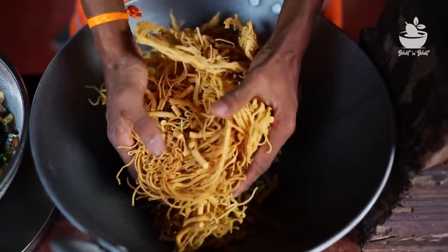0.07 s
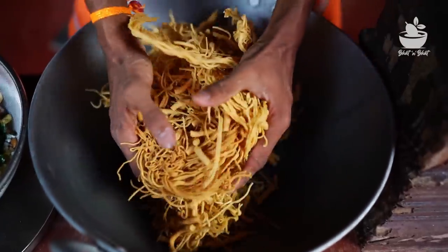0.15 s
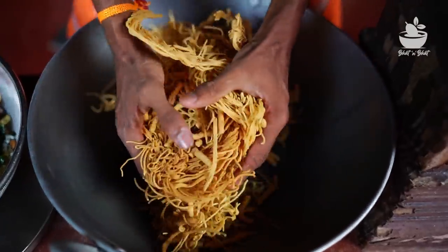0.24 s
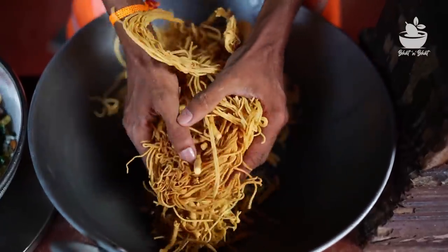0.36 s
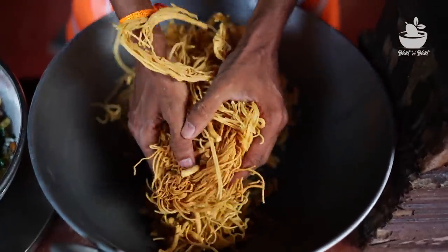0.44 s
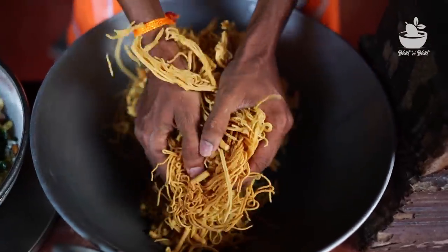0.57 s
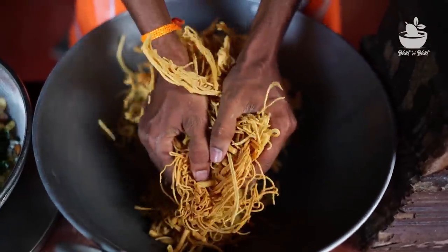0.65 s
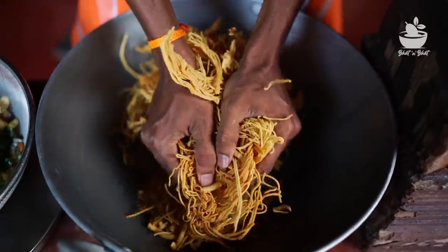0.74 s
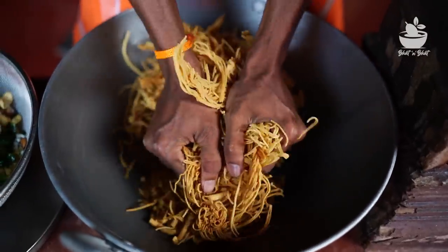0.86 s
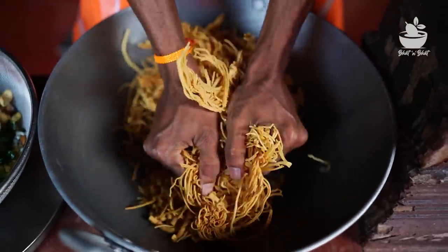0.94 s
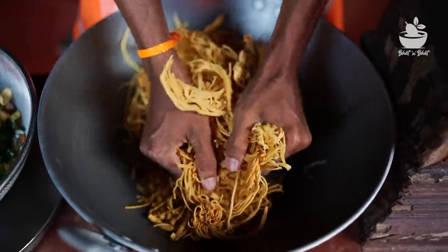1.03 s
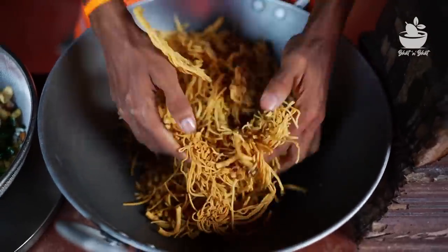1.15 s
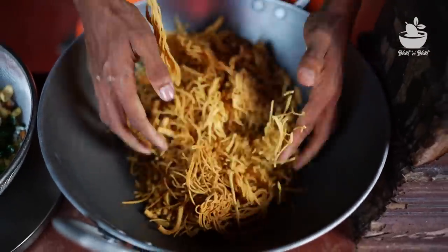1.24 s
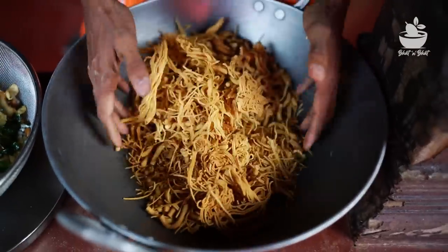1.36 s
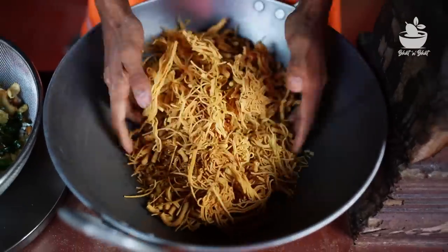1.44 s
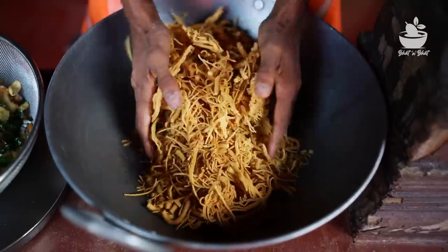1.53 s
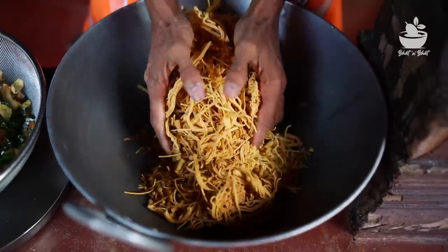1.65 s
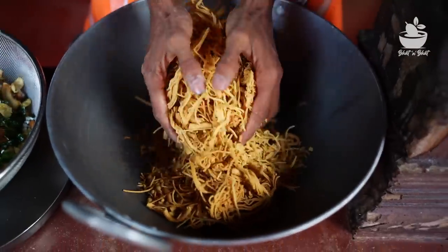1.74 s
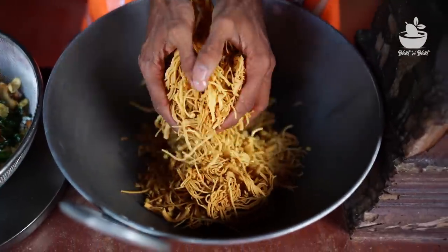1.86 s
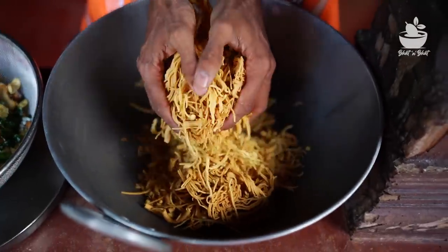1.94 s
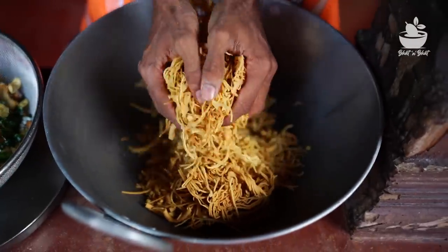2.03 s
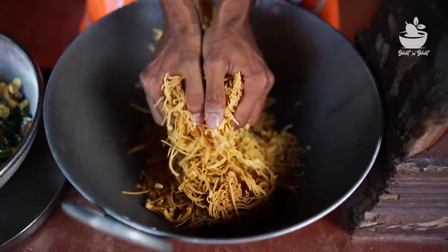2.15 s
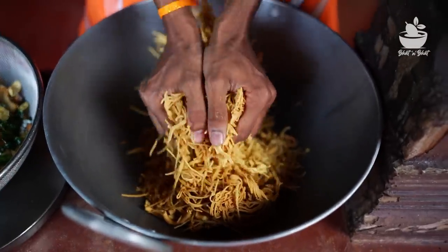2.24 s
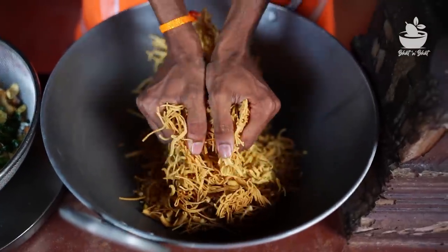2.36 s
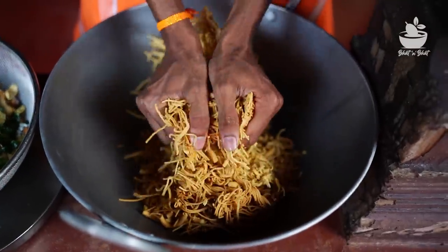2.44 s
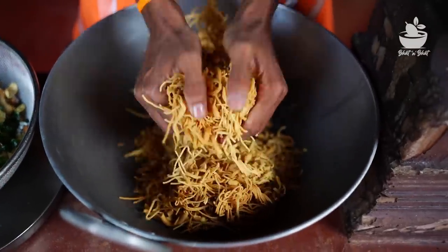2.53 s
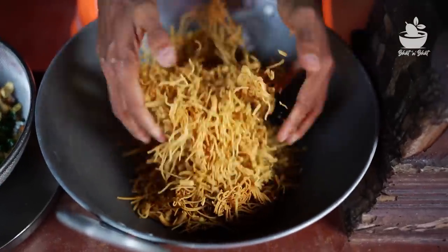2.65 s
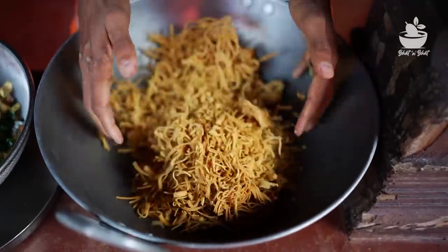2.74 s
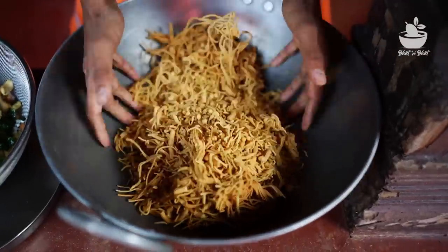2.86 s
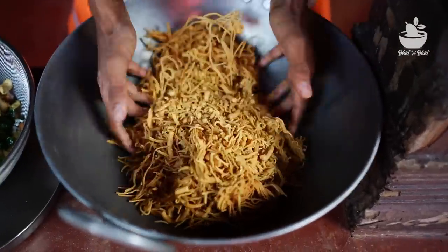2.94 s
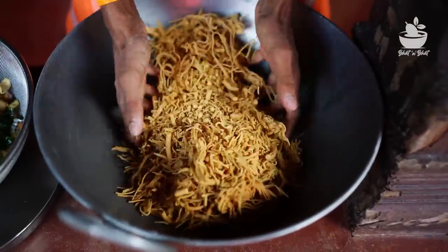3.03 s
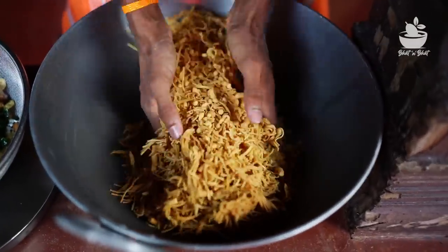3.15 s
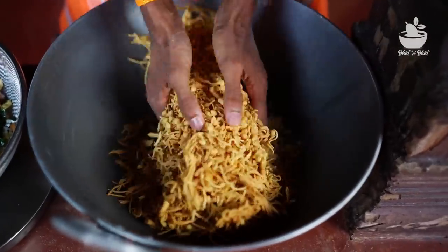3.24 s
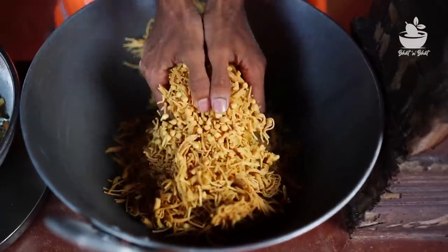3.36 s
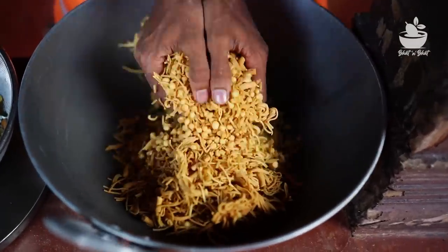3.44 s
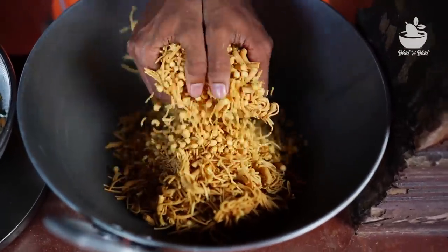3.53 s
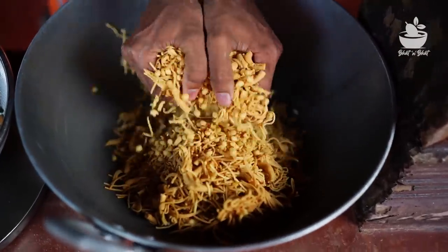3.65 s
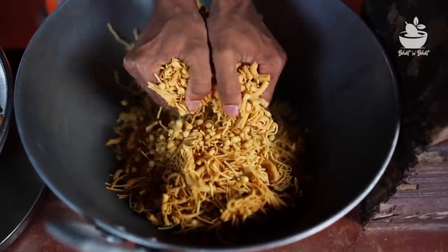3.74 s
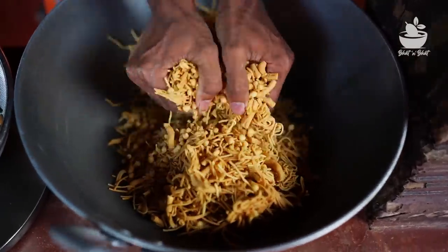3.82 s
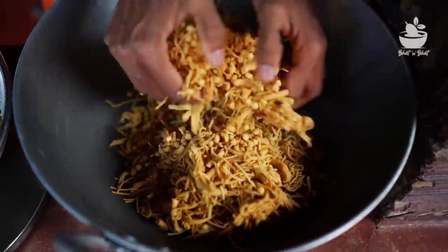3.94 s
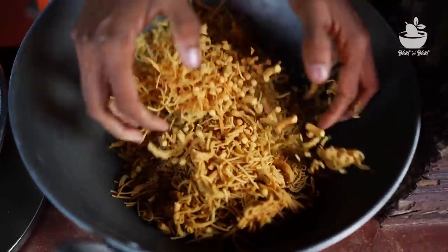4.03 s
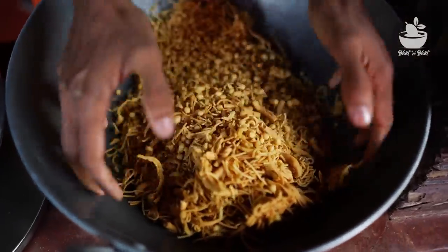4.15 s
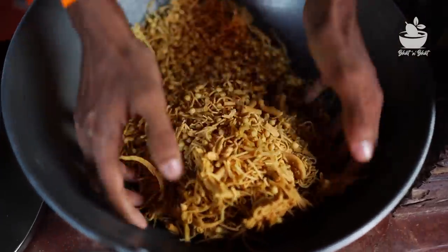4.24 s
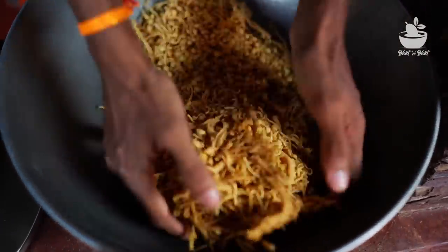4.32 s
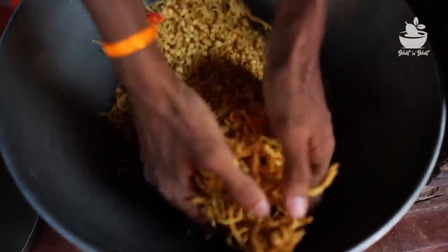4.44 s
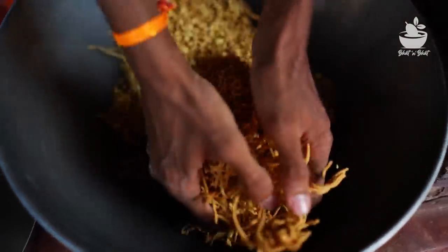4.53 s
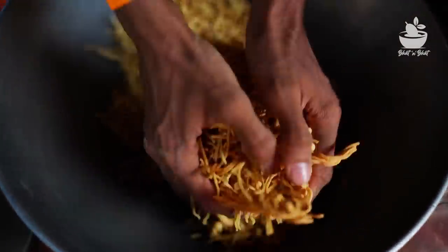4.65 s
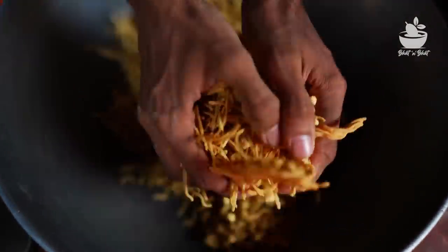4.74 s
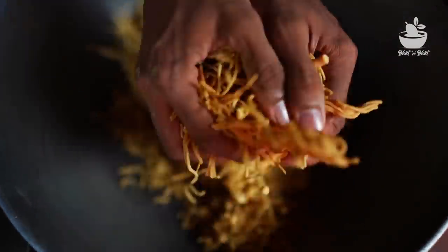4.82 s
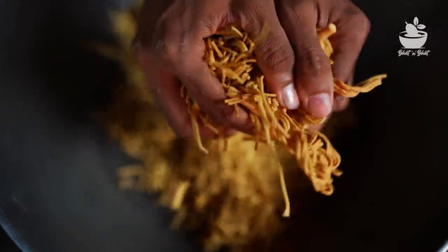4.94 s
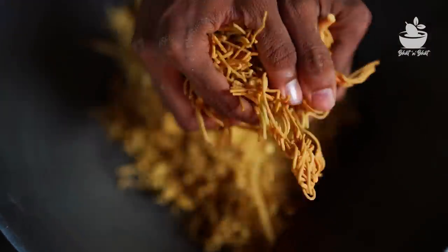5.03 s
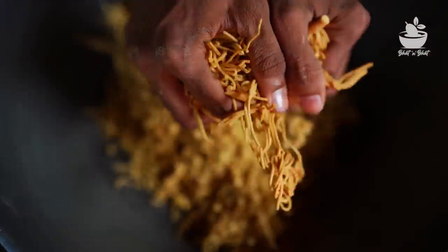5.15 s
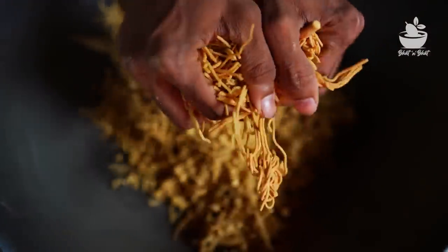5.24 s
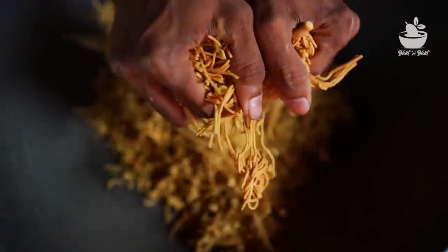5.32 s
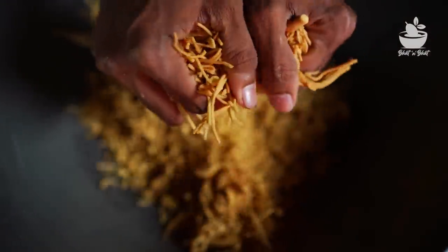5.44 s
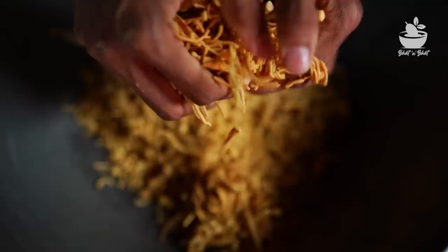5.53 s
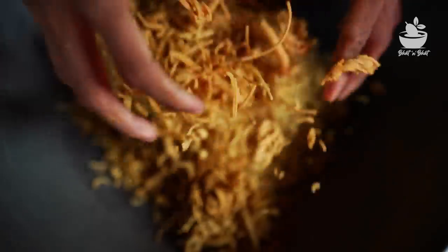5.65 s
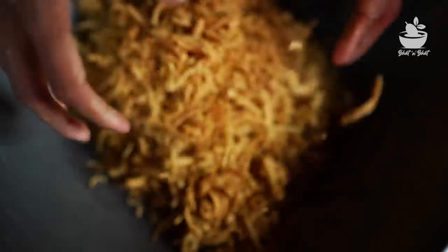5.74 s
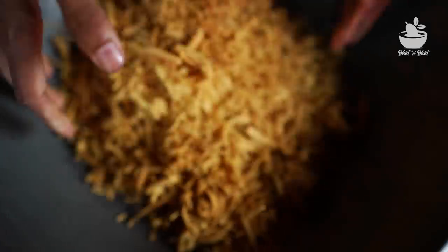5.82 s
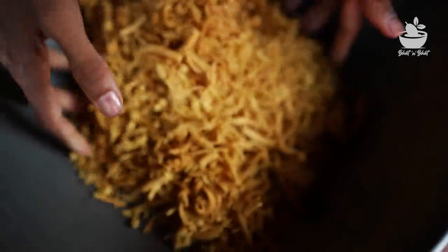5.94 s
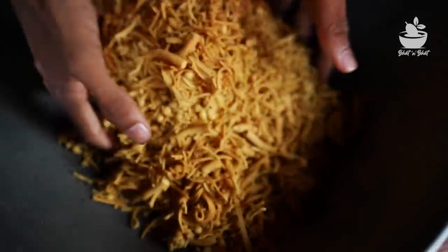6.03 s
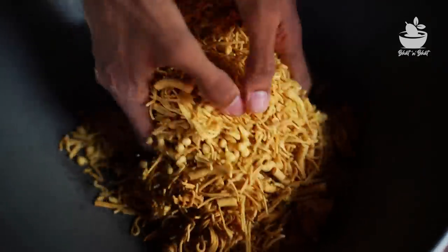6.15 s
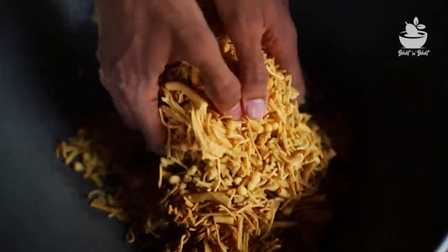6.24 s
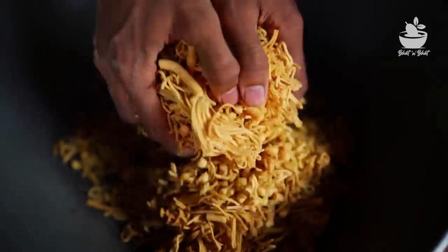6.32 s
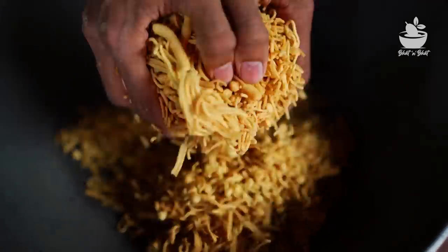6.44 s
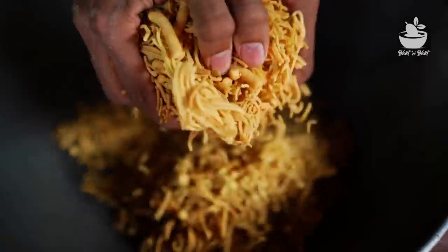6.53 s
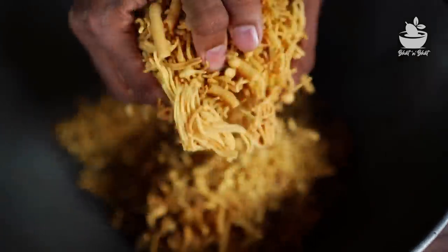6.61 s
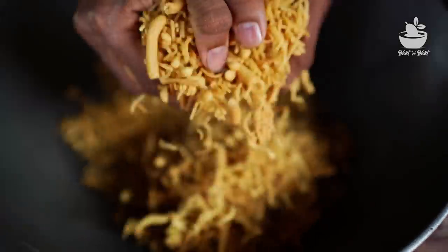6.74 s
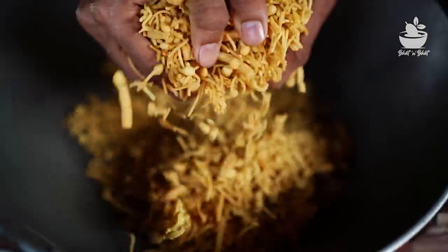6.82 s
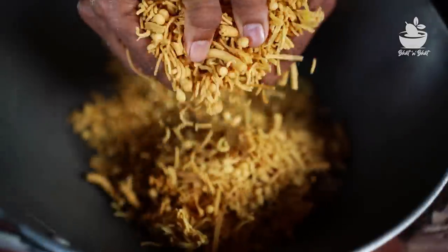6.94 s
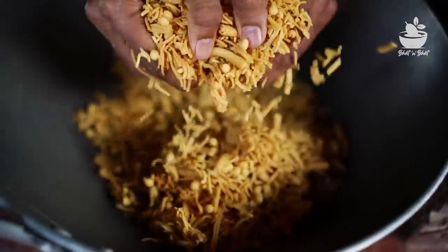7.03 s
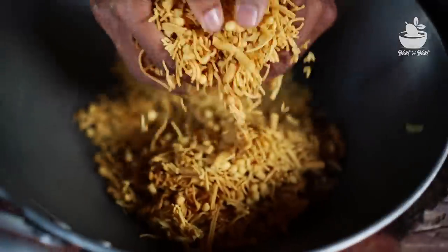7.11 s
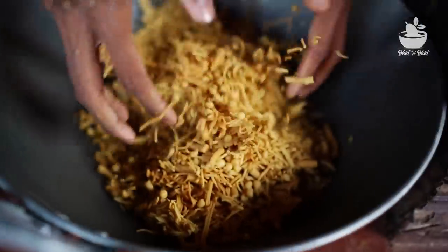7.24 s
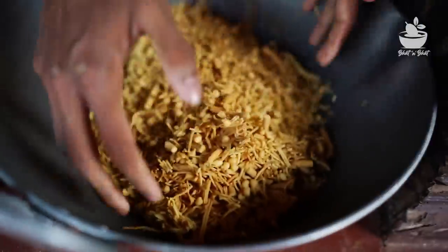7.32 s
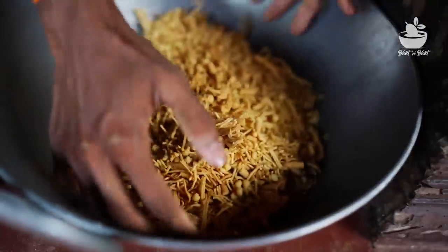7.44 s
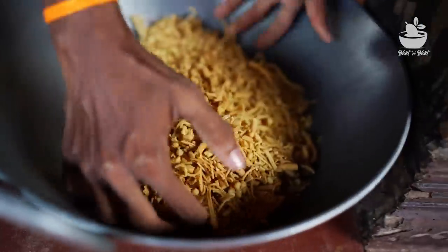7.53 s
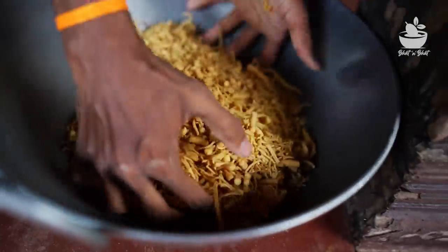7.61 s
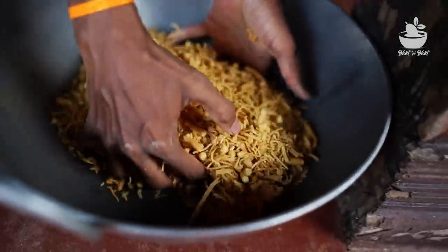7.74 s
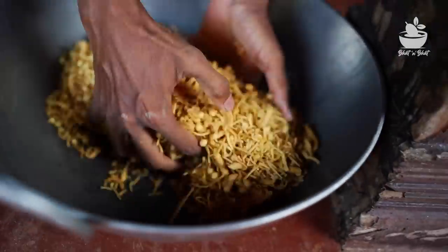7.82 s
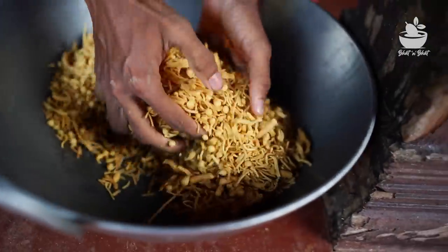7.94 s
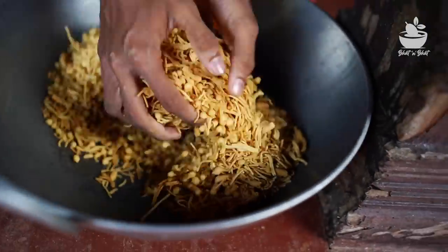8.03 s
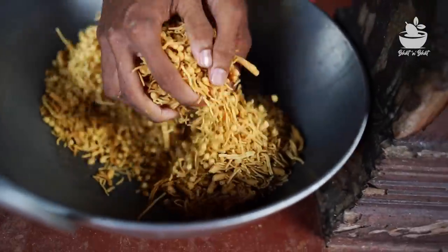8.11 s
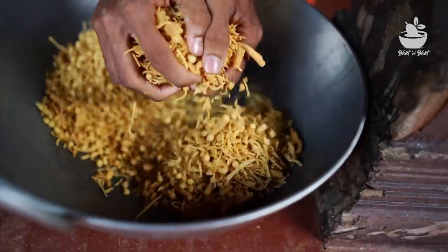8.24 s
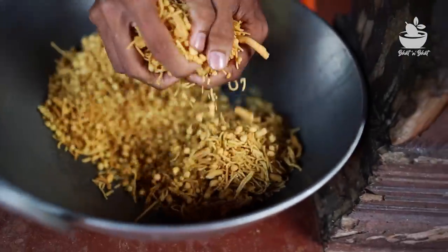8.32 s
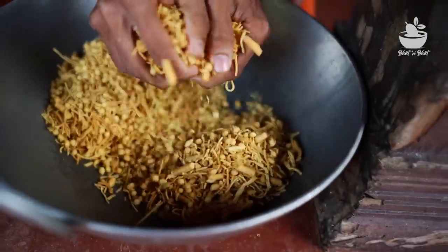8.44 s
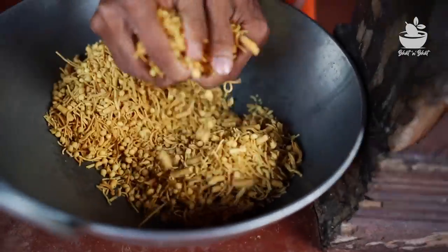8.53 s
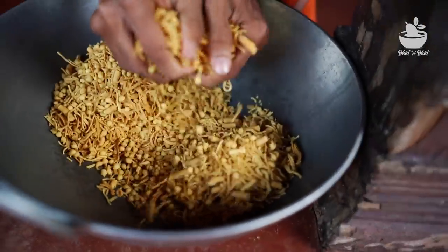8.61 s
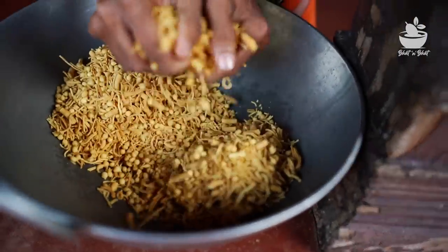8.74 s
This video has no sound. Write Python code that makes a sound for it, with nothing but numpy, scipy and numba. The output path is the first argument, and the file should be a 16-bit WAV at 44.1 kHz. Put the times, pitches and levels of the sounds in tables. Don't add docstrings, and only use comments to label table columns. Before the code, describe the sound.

Close, crisp crunching of dry fried strands squeezed by hand, handfuls dropping and rattling into a ringing metal wok, low steady kitchen hum beneath.

```python
import sys
import numpy as np
from scipy import signal
from scipy.fft import rfft, irfft, next_fast_len
from scipy.io import wavfile
from scipy.ndimage import uniform_filter1d
from numba import njit

SR = 44100
rng = np.random.default_rng(int(sys.argv[2]) if len(sys.argv) > 2 else 0)


def makeup_ratio(level_db):
    decades = np.asarray(level_db, float) / 20
    return 10 ** decades


def master_out(mix):
    frames = np.transpose(np.atleast_2d(mix))
    ceiling = np.clip(frames, -1, 1)
    pcm = np.round(ceiling * 32767).astype(np.int16)
    wavfile.write(sys.argv[1], SR, pcm)


N = 386905

# (frequency [Hz], density [dB per Hz])
SNAP_SPECTRUM = [(530, -31), (900, -15), (2330, -13.5), (2470, -16.5), (3680, -5.5), (5280, -7.5),
                 (7310, -4), (9530, -4.5), (13800, -15), (16000, -14.5)]
RATTLE_SPECTRUM = [(1650, -17.5), (2800, -20.5), (3160, -8), (4060, -4), (5610, -4.5), (5850, -7.5),
                   (6290, -5), (12000, -13.5), (15600, -24), (22000, -60)]
SLIDE_SPECTRUM = [(820, -37), (1400, -22), (1910, -4.5), (2070, -8), (2270, -4), (2510, -7), (2900, -10.5),
                  (3770, -8.5), (6380, -120)]
BOWL_SPECTRUM = [(71, -41), (120, -22), (177, -19), (251, -2), (307, -4), (422, -2.5), (459, -4.5),
                 (866, -10), (962, -20), (1500, -22.5), (1950, -63), (3300, -120)]
KITCHEN_SPECTRUM = [(15, -59), (25, -29), (54, -19), (145, -10), (237, 0.5), (297, -10), (419, -3.5),
                    (600, -27), (1400, -11), (2600, -60)]

# (frequency [Hz], width [Hz], level [dB])
WOK_MODES = [(3210, 51, -2), (3530, 38, -6.5), (4080, 98, 1.2), (4320, 88, -1), (4690, 68, -0.5),
             (4977, 36, 0.5), (5460, 65, 2.5), (5870, 35, -1.5), (6170, 74, 2.5), (6560, 31, -7),
             (6870, 64, -2.5), (7700, 100, -2.5), (8300, 64, -6)]
# (frequency [Hz], width [Hz], level [dB])
KNOCK_MODES = [(490, 130, 5.5), (725, 16, -4), (830, 9.9, -5), (1190, 95, -5)]

# (start [s], full [s], easing [s], end [s], effort [dB])
SQUEEZES = [(-.05, 0.12, 0.14, 0.5, -33), (0.375, 0.47, 0.81, 0.68, -31), (0.643, 0.715, 0.81, 0.99, -26),
            (0.845, 0.903, 0.94, 0.98, -25), (.95, .98, 0.98, 1.14, -36.5),
            (1.275, 1.308, 1.37, 1.34, -38.5), (1.984, 2.065, 2.15, 2.24, -32.5),
            (2.083, 2.236, 2.34, 2.473, -27), (3.46, 3.71, 3.76, 3.98, -32.5),
            (4.057, 4.103, 4.03, 4.21, -29), (4.327, 4.415, 4.3, 4.52, -32),
            (4.64, 4.907, 5.26, 5.09, -34.5), (5.077, 5.13, 5.2, 5.27, -31.5),
            (5.185, 5.29, 5.42, 5.38, -28), (5.37, 5.41, 5.1, 5.51, -40), (6.51, 6.8, 6.87, 7.0, -31),
            (6.95, 6.966, 6.8, 7.04, -33.5), (8.249, 8.502, 9.4, 10.1, -36.5)]
# (start [s], full [s], easing [s], end [s], weight [dB])
DROPS = [
    (1.153, 1.2, 1.23, 1.374, -28),
    (2.685, 2.73, 2.79, 2.81, -29),
    (4.004, 4.042, 4.07, 4.17, -28.5),
    (5.64, 5.7, 5.8, 5.8, -31),
    (5.772, 5.802, 5.8, 5.88, -29.5),
    (7.184, 7.253, 7.4, 7.34, -28.5),
    (8.13, 8.204, 8.1, 8.7, -33.5),
]
# (start [s], full [s], easing [s], end [s], push [dB])
SCOOPS = [(1.42, 1.526, 1.57, 1.66, -23.5), (1.58, 1.662, 1.815, 1.947, -29.5),
          (2.904, 2.994, 3.21, 3.29, -25.5), (3.252, 3.323, 4.2, 3.74, -34), (3.583, 3.727, 3.9, 3.78, -29),
          (4.287, 4.395, 4.52, 4.555, -25.5), (4.552, 4.599, 4.8, 4.94, -38.5),
          (5.945, 6.037, 6.13, 6.32, -23.5), (6.25, 6.34, 6.6, 6.83, -37),
          (7.574, 7.663, 7.78, 7.94, -23.5), (7.894, 7.97, 8.6, 8.33, -34)]
# (start [s], full [s], easing [s], end [s], flow [dB])
TRICKLES = [(-.1, 0, 0.013, 0.087, -30.5), (2.78, 2.84, 2.88, 2.96, -28.5), (3.8, 3.85, 4.6, 3.6, -35),
            (4.18, 4.3, 4.36, 4.42, -25.5), (5.415, 5.464, 5.4, 5.59, -38), (5.82, 5.866, 5.95, 6.0, -32.5),
            (6.624, 6.776, 7, 6.9, -29.5), (6.98, 7.02, 7.4, 7.2, -39.5), (7.26, 7.295, 7.37, 7.48, -31),
            (7.41, 7.43, 7.45, 7.5, -37.5), (7.48, 7.516, 7.55, 8.34, -31), (8.25, 8.33, 8.56, 8.6, -31)]
# (start [s], full [s], easing [s], end [s], load [dB])
LEANS = [(.85, 0.943, 0.99, 1.1, -37.5), (1.33, 1.38, 1.4, 1.4, -36.5), (1.565, 1.62, 1.8, 1.63, -40),
         (2.263, 2.33, 2.24, 2.35, -30), (2.92, 2.97, 3.03, 3.22, -41), (4.38, 4.407, 4.47, 4.53, -36),
         (4.14, 4.203, 4.3, 4.3, -37.5), (5.778, 5.807, 5.4, 5.9, -36), (6.025, 6.064, 6, 6.12, -34),
         (6.936, 6.99, 5.5, 7.2, -33.5), (7.402, 7.453, 7.8, 7.44, -36.5), (8.6, 8.7, 8.3, 9.6, -40)]

# (share [dB]), (drop at start and end [dB]), (rise while held [dB per s])
SQUEEZE_FEED = (0, -2, -14.5, -10.5), (11, 9, 7.5, 10.5), (2.5, -6, 17, 7)
DROP_FEED = (-7, 0, -7, -10.5), (12, 13, 18, 10.5), (-2, 24, -120, -18)
SCOOP_FEED = (-14, 0, -9, -11), (6, 9, 12, 8), (-6, -7, 2.5, -17)
TRICKLE_FEED = (-11.5, -1, -39, -14.5), (26, 14.5, 7, 6), (-15, -4, -5, 1)
LEAN_FEED = (-30, -30, -30, 0), (9, 9, 9, 13.5), (-5, -5, -5, 22)
# (snapping [dB], rattle [dB], sliding [dB], bowl [dB])
REST_DB = (-47.5, -45, -56.5, -49)

# (time [s], peak [dB], centre [Hz])
SPLITS = [(.0628, -9, 3190), (0.319, -12, 7190), (.431, -10.5, 7600), (0.471, -8, 7890), (0.698, -4, 7490),
          (0.737, -9.5, 6220), (.9042, -4, 7460), (1.9674, -14.5, 5350), (2.0672, -9, 5210),
          (2.2712, -7.5, 6790), (2.946, -4, 6260), (3.618, -11.5, 5480), (3.9415, -7.5, 4194),
          (4.0943, -7, 4300), (4.2038, -4.5, 5100), (5.005, -5.5, 7000), (5.055, -0.5, 5640),
          (5.192, -17, 7300), (5.6197, -5, 7400), (5.675, -13, 6450), (6.745, -5, 4050),
          (6.777, -6.5, 5000), (7.1806, -12.5, 5200), (8.1762, -7.5, 4080), (8.252, -9, 6220),
          (8.3175, -4.5, 5600), (8.3738, -1, 6340)]
# (time [s], peak [dB], centre [Hz])
TICKS = [(0.0677, -13.5, 8070), (0.0882, -24, 8160), (0.1034, -21, 5140), (0.1191, -25, 7810),
         (0.182, -13, 8860), (0.2314, -21, 7620), (0.2443, -21, 7340), (0.2834, -9.5, 6380),
         (0.3024, -12, 7440), (0.5841, -11, 4120), (0.6649, -12, 6870), (0.7644, -5, 7690),
         (0.9394, -11, 7400), (0.9694, -15, 3310), (1.0084, -22, 6500), (1.0404, -29, 4970),
         (1.1134, -23, 3840), (1.1702, -17, 4420), (1.1877, -12, 4140), (1.8694, -18, 3960),
         (1.9041, -19, 4440), (1.9144, -19, 6570), (1.935, -20, 4880), (2.0448, -11, 9100),
         (2.134, -14, 7010), (2.6638, -19, 6050), (2.6893, -14, 7480), (2.7674, -8, 6240),
         (2.8094, -6, 4410), (2.8744, -9, 5500), (2.8944, -13, 6260), (3.0174, -16, 4080),
         (3.274, -12, 6140), (3.5325, -17, 4050), (3.5424, -11, 4040), (3.5894, -17, 6620),
         (4.6209, -19, 5110), (4.9044, -20, 7930), (4.9317, -15, 4650), (5.4404, -15, 5490),
         (5.6516, -19, 8650), (5.895, -11, 5500), (6.1694, -12, 5480), (6.5635, -18, 7330),
         (6.5794, -15, 4690), (7.0225, -15, 6540), (7.1327, -18, 4150), (7.2065, -17, 5500),
         (7.246, -11, 4910), (7.5128, -16, 6180), (7.7079, -11, 5470), (7.7554, -8, 5470),
         (7.8894, -13, 4970), (7.9992, -15, 6140), (8.1044, -24, 4062)]
# (time [s], peak [dB], centre [Hz])
BREAKS = [(0.5306, -8, 6870), (0.794, -9, 7760), (0.82, -11, 8880), (1.0215, -10, 6700), (1.3, -5, 6260),
          (2.0326, -13, 8070), (2.2303, -12, 7190), (2.732, 1, 4250), (2.7541, -3.5, 5600),
          (2.796, -7, 6220), (3.3743, -9, 5460), (3.646, -3, 5630), (3.702, -5, 5540), (3.867, -5, 4900),
          (4.0675, -14, 4130), (4.129, -2, 5140), (5.125, -12, 8140), (5.156, -9, 6150), (5.292, -11, 7440),
          (5.423, -3.5, 7160), (5.7413, -7, 5960), (5.8027, -2.5, 5940), (5.815, -3, 6300),
          (6.6615, -3.5, 6800), (6.9828, -2, 3810), (7.2932, -5, 4800), (8.2224, -3.5, 6050),
          (8.3804, -4, 6140), (8.4254, -1.5, 6295), (8.635, -8, 5420)]
# (time [s], peak [dB], centre [Hz])
LANDINGS = [(0.328, -10.5, 4050), (1.2102, -6, 4170), (1.229, -2, 4850), (1.491, -13, 4120),
            (1.714, -9, 3900), (2.716, -8.5, 5200), (3.2825, -11, 5900), (3.5132, -10.5, 4370),
            (3.83, -19, 6690), (3.8424, -8.5, 5560), (4.17, -10, 6000), (4.276, -13, 6740),
            (4.2986, -16, 6190), (5.7026, -3.5, 5540), (5.725, -9, 7400), (6.1404, -11, 5400),
            (6.7067, -5.5, 5460), (6.8374, -4, 4900), (7.3173, -11, 6600), (7.3364, -8.5, 6500),
            (7.3928, -10, 6260), (7.421, -10, 4550), (7.7852, -2, 4100), (8.2798, -3, 6260),
            (8.5096, -11.5, 6160), (8.5428, -3, 4600), (8.578, -7.5, 5980), (8.6076, -3, 4820),
            (8.6617, -9, 7760)]
# (time [s], peak [dB], centre [Hz])
MORE_LANDINGS = [(0.979, -13, 3950), (.997, -27, 7054), (1.7444, -12, 4050), (2.5098, -18.5, 4110),
                 (2.594, -16, 4600), (4.108, -5.5, 4500), (4.141, -3, 6500), (4.636, -12.5, 4970),
                 (5.048, -3.5, 3980), (5.9229, -14, 4590), (6.345, -12.5, 5000), (6.8656, -11, 4100),
                 (7.4975, -14.5, 4100), (7.873, -13, 5470), (5.034, -20, 5470), (6.972, -13, 7000),
                 (5.787, -19, 3500), (6.711, -8.5, 7400), (8.201, -18, 5900), (8.368, -12, 4000),
                 (8.0521, -12.5, 5860), (8.745, -11, 5900)]
# (time [s], peak [dB], centre [Hz])
LUMPS = [(0.904, -20, 910), (0.9231, -18.5, 925), (2.2674, -23, 1550), (2.2797, -19.5, 1510),
         (2.308, -18.5, 1170), (2.3358, -21, 1380), (2.4013, -22.5, 1540), (3.751, -26, 1690),
         (5.2926, -22, 1690), (5.3338, -22, 1390), (5.3506, -20, 1360), (5.8034, -40, 1990),
         (5.8137, -26.5, 2030)]
METAL_DB = -11.5, -12.5, -8.5

# (time [s], peak [dB], knock share [dB], boom [Hz])
THUMPS = [
    (1.426, -32, -19, 252),
    (1.493, -27, -16, 330),
    (1.598, -25, 1.5, 237),
    (1.652, -31, 5, 233),
    (2.71, -33, -18, 254.5),
    (6.044, -14, -1, 257),
    (8.172, -24, 3.5, 250),
    (8.227, -29, 4, 249.7),
]
# (time [s], peak [dB], frequency [Hz])
TAPS = [
    (4.108, -16.5, 445),
    (4.132, -19, 496),
    (4.172, -29, 500),
    (5.294, -19, 725),
    (5.353, -27, 497),
    (5.815, -25, 450),
    (5.827, -25, 382),
]


@njit
def bursts(start, size, hz, width, keep, noise, strike):
    out = np.zeros(len(noise))
    for j in range(len(start)):
        g = np.tan(np.pi * hz[j] / SR)
        k = width[j] / hz[j]
        band, low = strike * size[j] / k, 0.
        level, i = size[j], start[j]
        stop = min(len(out), i + int(7 / (1 - keep[j])))
        while i < stop:
            drive = level * noise[(i + 7919 * j) % len(out)]
            v = (band + g * (drive - low)) / (1 + g * (g + k))
            band = 2 * v - band
            low += 2 * g * v
            level *= keep[j]
            out[i] += k * v
            i += 1
    return out


def decay(t60):
    return np.exp(-np.log(1000) / (t60 * SR))


def shower(rate, spread_db, most_db, lo_hz, hi_hz, sharp, t60, strike):
    when, rank, pitch, length = rng.random((int(rate * N / SR), 4)).T
    hz = lo_hz * (hi_hz / lo_hz) ** pitch
    size = makeup_ratio(np.minimum(-spread_db * np.log(1 - rank), most_db))
    keep = decay(t60 * (0.15 + length ** 2))
    start = (when * N).astype(np.int64)
    return bursts(start, size, hz, hz / sharp, keep, rng.standard_normal(N), strike)


def tint(x, shape, lo_hz, hi_hz):
    m = next_fast_len(N)
    f, spec = np.arange(m // 2 + 1) * SR / m + 1, rfft(x, m)
    own = np.sqrt(uniform_filter1d(np.abs(spec) ** 2, size=2500) + 1e-9)
    shape_hz, shape_db = np.transpose(shape)
    spec = spec / own * makeup_ratio(np.interp(np.log(f), np.log(shape_hz), shape_db))
    in_band = (f > lo_hz) & (f < hi_hz)
    gain = m / np.sqrt(2 * np.sum(np.abs(spec[in_band]) ** 2)) * np.sqrt(N / m)
    return irfft(spec, m)[:N] * gain


def wander(count):
    s = np.arange(0, N + SR, SR // count)
    return np.interp(np.arange(N), s, rng.standard_normal(len(s)))


def peak(x, hz, width):
    return signal.lfilter(*signal.iirpeak(hz, hz / width, SR), x)


def gliding_peak(x, hz, width):
    turn = np.exp(2j * np.pi * np.cumsum(hz) / SR)
    keep = np.exp(-np.pi * width / SR)
    return 2 * np.real(turn * signal.lfilter([1 - keep], [1, -keep], x / turn))


def highpass(x, order, hz):
    return signal.sosfilt(signal.butter(order, hz, "high", fs=SR, output="sos"), x)


def ring(x, ring_db, shift_db, drift):
    modes = np.zeros(N)
    for hz, width, db in WOK_MODES:
        level = makeup_ratio(db + shift_db * wander(count=7))
        modes += level * gliding_peak(x, hz * (1 + drift * wander(count=3)), width)
    return x + makeup_ratio(ring_db) * modes


def hands():
    t = np.arange(0, N / SR, .002)
    power = makeup_ratio(REST_DB)[:, None] ** 2
    gestures = [(SQUEEZES, SQUEEZE_FEED), (DROPS, DROP_FEED), (SCOOPS, SCOOP_FEED),
                (TRICKLES, TRICKLE_FEED), (LEANS, LEAN_FEED)]
    for rows, (share_db, drop_db, rise_db) in gestures:
        for start, full, easing, end, db in rows:
            slack = 1 - np.interp(t, [start, full, easing, end], [0, 1, 1, 0])
            outside = np.maximum(start - t, 0) + np.maximum(t - end, 0)
            held = np.clip(t - full, 0, end - full)
            level = db + np.reshape(share_db, (4, 1)) - np.outer(drop_db, slack)
            level = level + np.outer(rise_db, held) - 254 * outside
            power = power + makeup_ratio(level) ** 2
    return [np.interp(np.arange(N) / SR, t, 10 * np.log10(p)) for p in power]


def snapping():
    breaks = shower(2500, 4.0, 11.6, 2320, 12300, sharp=0.92, t60=0.032, strike=4.0)
    return tint(breaks, SNAP_SPECTRUM, 7920, 18800)


def cracks():
    s, db, hz = np.transpose(SPLITS + TICKS + BREAKS + LANDINGS + MORE_LANDINGS)
    kinds = [len(SPLITS + TICKS), len(BREAKS), len(LANDINGS + MORE_LANDINGS)]
    edge_db = np.repeat([-6.5, -23.5, -42], kinds)
    metal_db = np.repeat(METAL_DB, kinds)
    i, one = (s * SR).astype(np.int64), np.ones(len(s))

    def smooth():
        return rng.standard_normal(N)

    def grit():
        return smooth() * makeup_ratio(1.6 * wander(count=700) - 2.5)

    spike = bursts(i, makeup_ratio(db - 10.5), hz, hz / 0.73, decay(0.0047 * one), smooth(), 0.41)
    body = bursts(i, makeup_ratio(db - 5), hz, hz / 1.66, decay(0.037 * one), grit(), 0.2)
    edge = bursts(i, makeup_ratio(db + edge_db - 13.0), 11000 * one, 7000 * one, decay(0.075 * one), grit(), .05)
    metal = bursts(i, makeup_ratio(db + metal_db), hz, hz / 2.4, decay(0.03 * one), smooth(), 0.24)
    s, db, hz = np.transpose(LUMPS)
    i = (s * SR).astype(np.int64)
    lumps = bursts(i, makeup_ratio(db + 5.5), hz, hz / 2.0, decay(0.066 + 0 * s), smooth(), 0.43)
    small = body + spike + ring(metal, ring_db=9.5, shift_db=6.5, drift=.004) + edge
    return highpass(small, 3, 3100) + makeup_ratio(-18) * small + lumps


def rattling(lift_db):
    hits = shower(1100, 0.9, 10.0, 3780, 7600, sharp=2.53, t60=0.11, strike=2.15)
    rattle = tint(hits, RATTLE_SPECTRUM, 2650, 11200)
    return ring(rattle, ring_db=3.0 + 0.45 * (lift_db - 6.0), shift_db=2.0, drift=0.0047)


def sliding(slide_db):
    rubs = shower(1500, 0.73, 21, 1340, 2860, sharp=2.0, t60=0.091, strike=0.15)
    slide = tint(rubs, SLIDE_SPECTRUM, 1410, 3300)
    wall_hz = 2247 - 18 * (slide_db + 36)
    return slide + makeup_ratio(4.0 + 0.48 * (slide_db + 29.0)) * gliding_peak(slide, wall_hz, 56)


def bowl_boom(lift_db):
    blows = shower(1200, 2.4, 7.5, 154, 1370, sharp=0.9, t60=0.057, strike=0.45)
    bowl = tint(blows, BOWL_SPECTRUM, 150, 1550)
    air_hz = 245 * (1 + 0.053 * wander(count=4))
    bowl = bowl + makeup_ratio(-1.5 + 0.5 * (lift_db - 5.0)) * gliding_peak(bowl, air_hz, 30)
    low_rim = makeup_ratio(-6.5 + 4.7 * wander(count=4)) * peak(bowl, 421.4, 8.9)
    high_rim = makeup_ratio(-8.0 + 4.9 * wander(count=4)) * peak(bowl, 850, 4.6)
    return bowl + low_rim + high_rim


def thumps():
    t, out = np.arange(SR // 4) / SR, np.zeros(N + SR)

    def tone(hz):
        return np.sin(2 * np.pi * hz * t)

    for s, db, knock_db, boom_hz in THUMPS:
        boom = makeup_ratio(6.5) * tone(boom_hz) * (1 - np.exp(-t / 0.011)) * np.exp(-t / 0.014)
        rock = makeup_ratio(-10.5) * tone(0.64 * boom_hz) * np.exp(-t / 0.012)
        knock = np.zeros(len(t))
        for hz, width, mode_db in KNOCK_MODES:
            detuned = tone(hz * (1 + 0.03 * rng.standard_normal()))
            knock += makeup_ratio(knock_db + mode_db - 8.5) * detuned * np.exp(-np.pi * width * t)
        out[int(s * SR):][:len(t)] += makeup_ratio(db) * (boom + rock + knock)
    for s, db, hz in TAPS:
        low = tone(0.96 * hz) * np.exp(-t * hz / 1.07)
        high = makeup_ratio(0.5) * tone(1.47 * hz) * np.exp(-t * hz / 0.95)
        out[int(s * SR):][:len(t)] += makeup_ratio(db - 1.5) * (low + high)
    return highpass(out[:N], 2, 110)


def kitchen_noise():
    return tint(rng.standard_normal(N), KITCHEN_SPECTRUM, 25, 600) * makeup_ratio(-54.5)


def scene():
    snap_db, rattle_db, slide_db, bowl_db = hands()
    lift_db = rattle_db - snap_db
    clumps = wander(count=45)
    snap = snapping() * makeup_ratio(snap_db + 1.38 + 1.0 * clumps + 1.63 * wander(count=160))
    metal = rattling(lift_db) * makeup_ratio(rattle_db - 3)
    metal = metal + sliding(slide_db) * makeup_ratio(slide_db - 3)
    metal = metal + bowl_boom(lift_db) * makeup_ratio(bowl_db - 2.5)
    wok = snap + cracks() + metal * makeup_ratio(0.56 * clumps) + thumps()
    return (highpass(wok, 3, 140) + kitchen_noise())[None]


def band_limit(x):
    return signal.sosfilt(signal.butter(12, 16820, fs=SR, output="sos"), x)


def record(dry):
    mix = signal.sosfilt(signal.ellip(10, .2, 70, 15720, fs=SR, output="sos"), dry)
    return band_limit(mix)


dry = scene()
out = record(dry)
master_out(out)
```